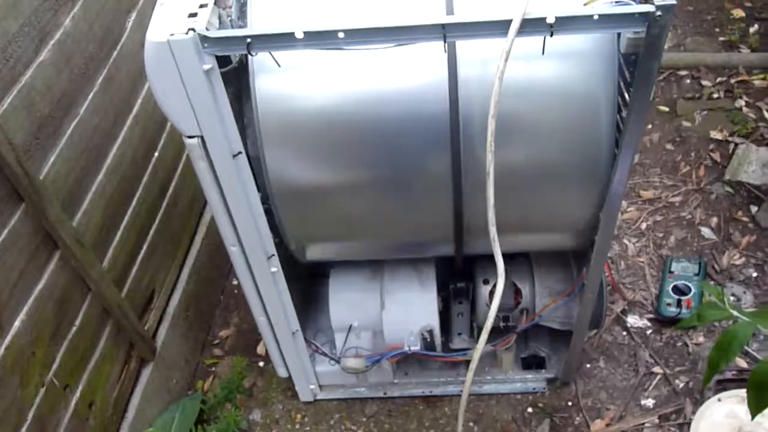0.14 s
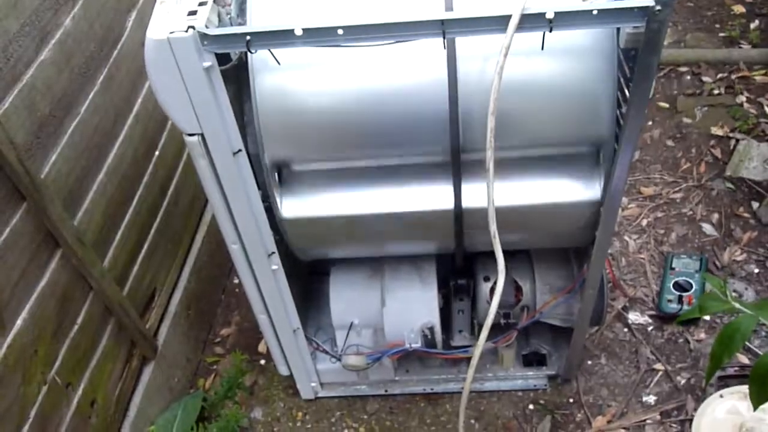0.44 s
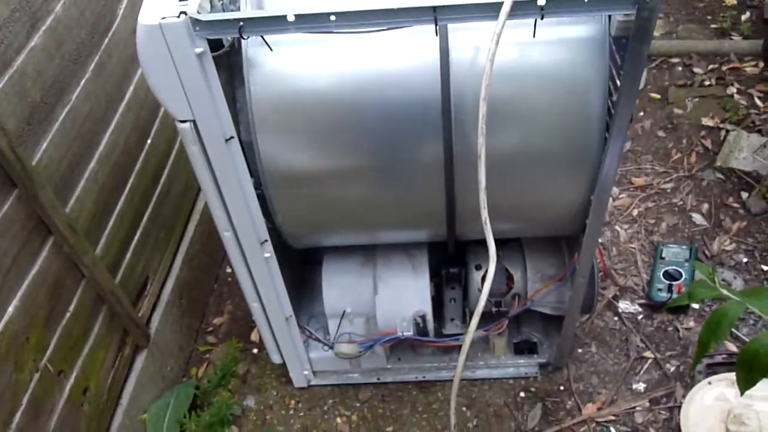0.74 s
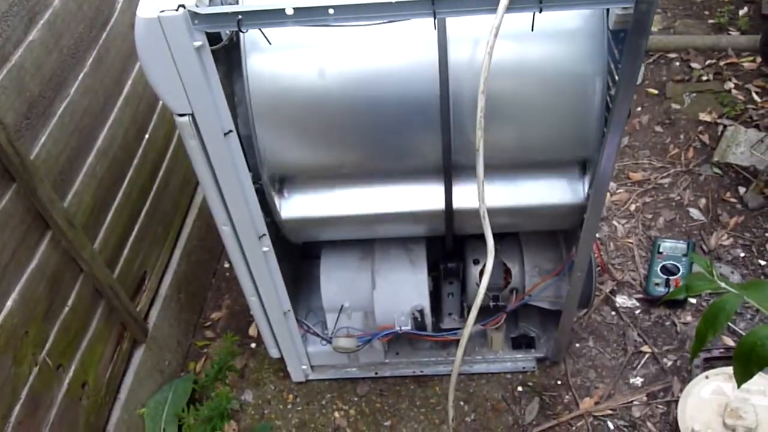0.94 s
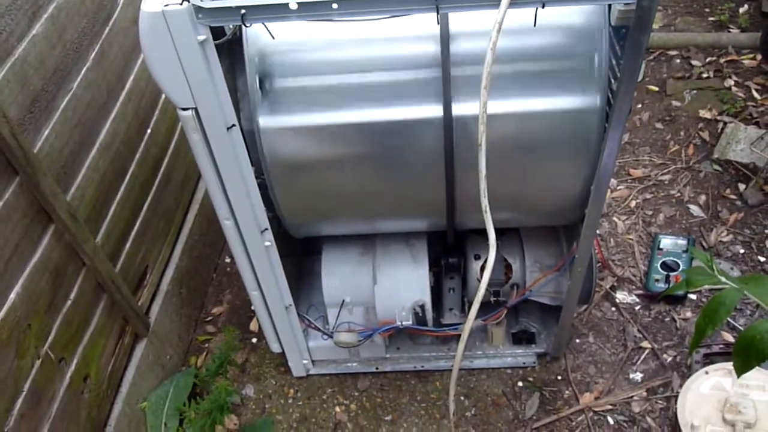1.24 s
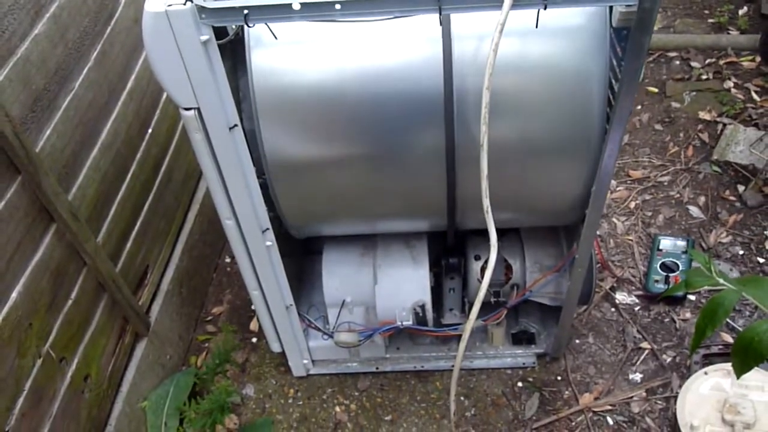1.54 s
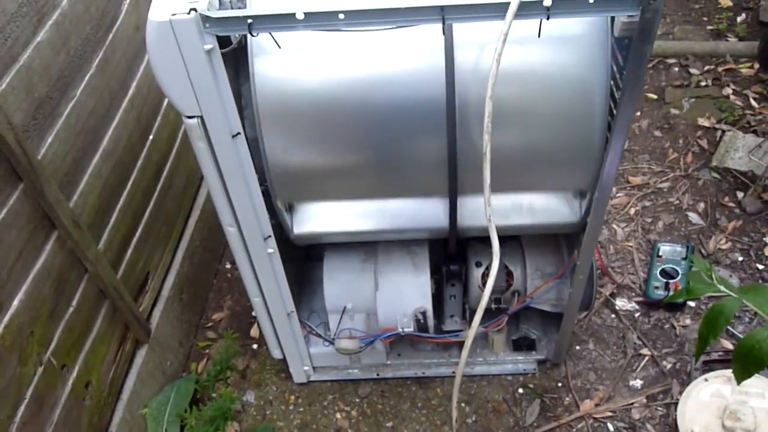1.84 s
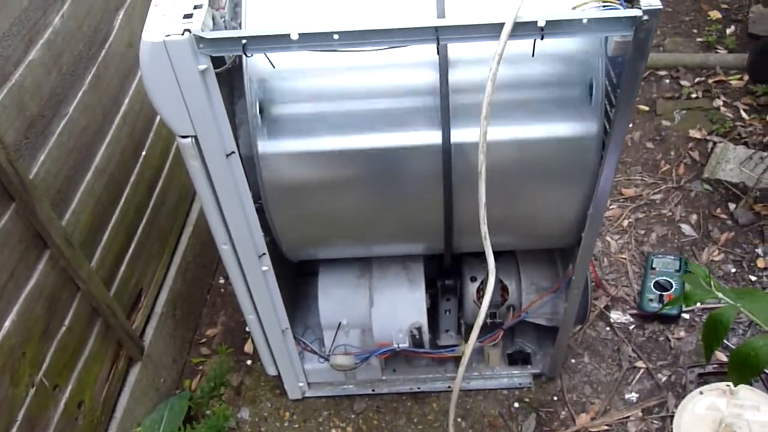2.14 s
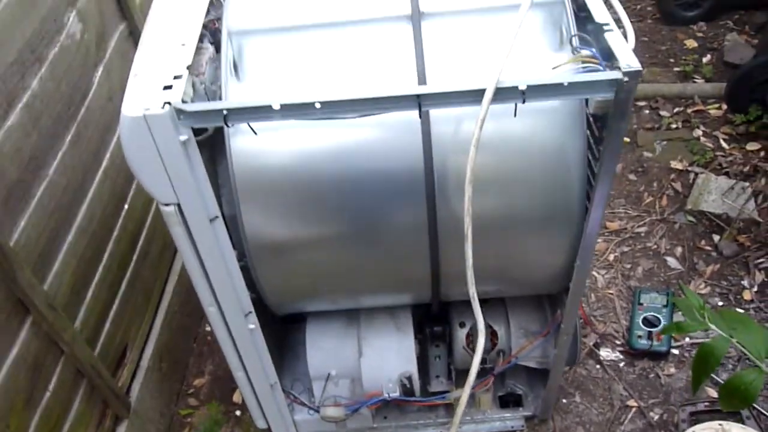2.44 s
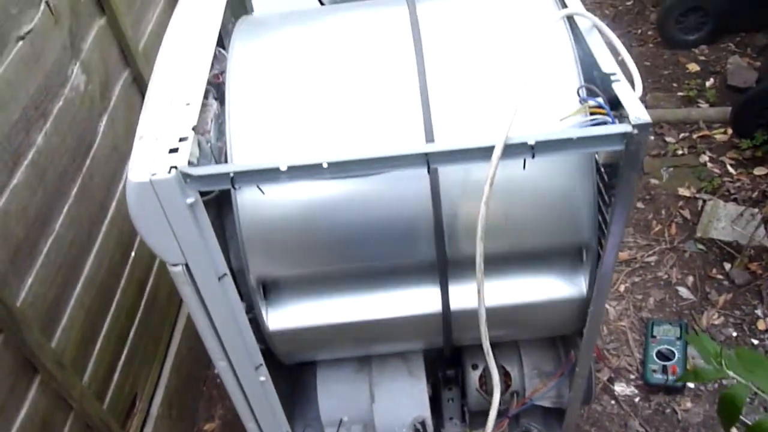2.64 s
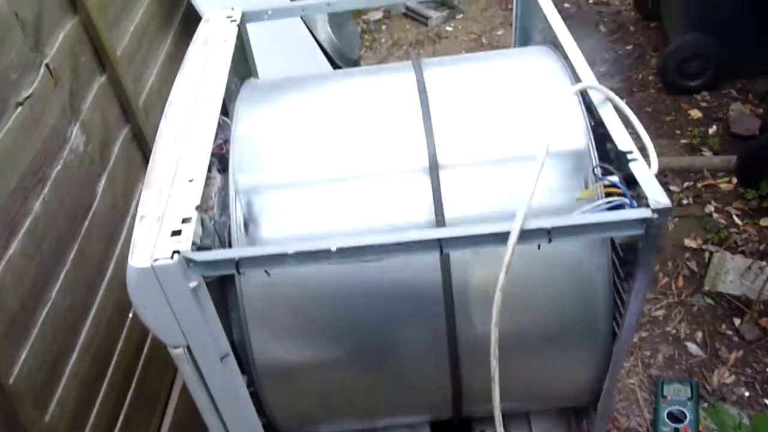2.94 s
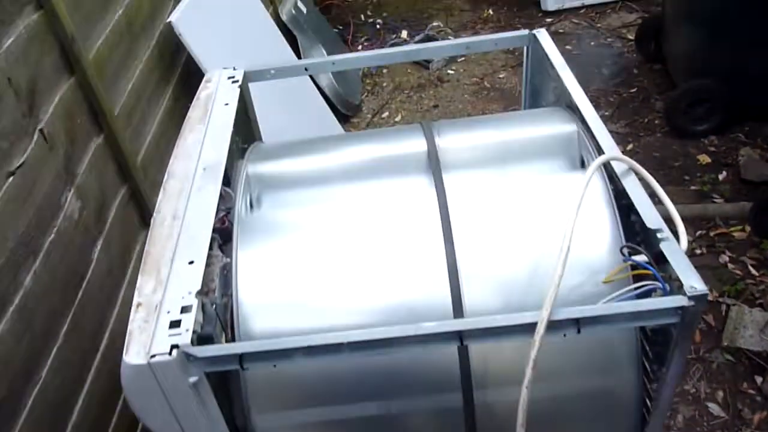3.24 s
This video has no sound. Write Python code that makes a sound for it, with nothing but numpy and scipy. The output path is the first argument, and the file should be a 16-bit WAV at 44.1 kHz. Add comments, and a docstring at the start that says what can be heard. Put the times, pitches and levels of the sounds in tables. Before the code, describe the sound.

A tumble dryer with panels removed runs outdoors, heard close on a hand-held stereo microphone: steady drum rumble, fan whine and hiss, a bright metal tick early, then scattered knocks, the strongest near the end.

```python
"""Open tumble dryer in a yard

Close, hand-held camera with a two-port microphone. A barely audible sub-bass offset dies away as the microphone
opens, under the motor's hum and fan whine, made of sines. The steel drum rumbles and its seals hiss, both
coloured noise; gritty contacts make the rim's scrapes. Blows ring the drum's modes and clatter its panels;
once, a bright metal tick shimmers and rings. The microphone opens abruptly; three notches dent the treble and
the top is cut."""
import sys
import numpy as np
from scipy import signal
from scipy.fft import rfft, irfft
from scipy.io import wavfile

SR = 44100
rng = np.random.default_rng(int(sys.argv[2]) if len(sys.argv) > 2 else 0)


def wav_out(sig):
    """Save sig, one row per channel (or a flat mono array), as 16-bit PCM at SR to the path in sys.argv[1]."""
    wavfile.write(sys.argv[1], SR, np.round(np.clip(np.atleast_2d(sig).T, -1, 1) * 32767).astype(np.int16))


N = 149058

# Decaying sub-bass swings, as the microphone opens and fainter later: start_s, level_db, pitch_hz, decay_s
SUB_BASS_SWINGS = [(.206, -20, 12, .025), (2.72, -35, 32, .035)]

# Fan whine, which follows the motor's speed: time_s, pitch_hz, level_db (before the trim)
WHINE = [(.2, 1030, -27), (.42, 1034, -27.5), (.6, 1043, -27.5), (.78, 1041, -28), (1.05, 1028, -26),
         (1.3, 1040, -28), (1.65, 1036, -28), (1.92, 1033, -27), (2.14, 1043, -27), (2.42, 1038, -28),
         (2.57, 1041, -27), (2.7, 1040, -30.5), (2.88, 1031, -33), (3.15, 1030, -41), (3.22, 1043, -32.5),
         (3.34, 1048, -29), (3.38, 1046, -31)]
WHINE_TRIM_DB, OCTAVE_DB, WHINE_LEFT_OVER_RIGHT_DB = -1.2, -16.5, -2.5
WHINE_FLUTTER, WHINE_JITTER = 0.14, 0.0014  # rms share of level, of pitch
HUM_HZ, HUM_DB = 201.1, -42

# Colour of the drum's rumble: frequency_hz, relative level_db per Hz
RUMBLE_COLOUR = [(25, -35), (45, -16), (65, -16.5), (90, -9.5), (130, -6), (175, -2), (240, -1),
                 (350, 0.65), (440, -4), (510, -.5), (610, -1.5), (690, -6), (860, -4), (1000, -1.5),
                 (1130, -7), (1400, -9), (1650, -12.5), (2100, -12), (2500, -17.5), (3200, -24.5),
                 (4500, -27.5), (8000, -47)]
# Rumble as the drum turns: time_s, relative level_db
RUMBLE_LEVEL = [(.2, 2.5), (.3, 0), (.48, 0.5), (.58, 0), (.72, 1.5), (.82, -0.5), (1.0, 0.5), (1.4, -1),
                (1.65, 0), (2.0, 1), (2.11, -0.5), (2.26, 0.7), (2.55, .5), (2.65, -0.5), (2.76, 0),
                (2.89, -1), (3.02, 1), (3.15, -0.5), (3.33, 1)]
RUMBLE_DB, RUMBLE_SWELL_DB, RUMBLE_FLICKER_DB = -25, 0.57, 0.36
CHATTER_PER_S, CHATTER_SPREAD_DB, CHATTER_POWER_SHARE = 500, 2.1, 0.34

# Colour of the seals sliding on the drum: frequency_hz, relative level_db per Hz
HISS_COLOUR = [(500, -53), (2500, 3), (4000, 3), (6000, 1), (8600, 1.5), (10500, -2), (13500, -3.5),
               (15500, -14.5)]
# Seals' hiss as the drum turns: time_s, relative level_db
HISS_LEVEL = [(.2, 1.5), (1.0, -1), (1.1, 0), (1.3, 0.5), (1.9, -0.5), (2.03, 1.5), (2.28, 1), (2.43, 1.5),
              (2.65, 0), (3.38, 0.1)]
HISS_DB, HISS_SWELL_DB = -37.5, 1.03

# Treble of rumble and hiss as the camera rises over the cabinet: time_s, relative level_db
TREBLE_LEVEL = [(.2, -0.9), (1.1, 0.6), (2.0, -1), (2.5, -0.5), (2.85, -1.5), (3.38, -2)]
TREBLE_FROM_HZ = 590

# Scrapes of the drum's rim: start_s, length_s, level_db, brightness_db
SCRAPES = [(.228, .035, -24.5, -6), (.38, .035, -33, 5), (.703, .02, -23, -5), (1.2, .04, -29.5, -4),
           (1.607, .025, -26, -1), (2.366, .017, -25.5, -3), (2.552, .034, -27.5, 2), (3.255, .022, -32, 3)]
# Colour of rubbing steel: frequency_hz, relative level_db per Hz
SCRAPE_COLOUR = [(500, -20), (900, -2), (1400, 0), (2100, -4), (3200, -11), (4200, -14), (7000, -32),
                 (12000, -48)]
SCRAPE_BRIGHT_HZ, SCRAPE_GRAINS_PER_S = 2500, 1800

# Drum knocks: start_s, level_db, ring pitch ratio, clatter_db (relative to the knock), rattle decay_s
KNOCKS = [(.356, -14.5, .8, -7, .015), (.386, -10, .95, -6, .022), (.694, -13.5, .97, -6, .02),
          (1.8782, -9, .85, 0, .011), (1.8935, -7.5, .86, -7, .018), (1.9045, -14, .88, -4, .008),
          (2.262, -17.5, .75, -6, .02), (2.801, -16.5, .68, -6, .012), (2.9394, -2, 1.02, -2.5, .007),
          (2.9512, -9, 1, .5, .008), (2.9625, -16, 1, 1, .01), (2.9762, -18, 2, 3, .008),
          (3.2595, -13, 1.03, -3, .018)]
# Ring of the drum: frequency_hz (before the pitch ratio), level_db, t60_s
DRUM_MODES = [(495, -11, .13), (545, 0, .052), (760, -11, .06), (1030, -10, .035), (1660, -17, .035),
              (1950, -9, .032)]
# Colour of the thin panels' dense, short clatter: frequency_hz, relative level_db per Hz
CLATTER_COLOUR = [(80, -45), (250, -18), (480, -2), (800, 0), (1400, -4), (2050, -1), (3000, -18),
                  (4200, -23), (7000, -36), (12000, -50)]
CLATTER_DB, RATTLE_DB, RATTLE_PER_S = -11, -10, 900
RING_RISE_S, RING_LOW_HZ = .0013, 330

# Snap and rebound of the metal tick: start_s, level_db
TICKS = [(.6258, -14.5), (.629, -16.5)]
# Colour of the tick's shimmer: frequency_hz, relative level_db per Hz
TICK_COLOUR = [(1200, -15), (3000, -3), (4200, -1.5), (5200, -5), (6200, 4), (7500, 0), (9500, 3.5),
               (13400, 2.5), (15500, -2)]
# Ring of the small metal part: frequency_hz, relative level_db, t60_s
TICK_MODES = [(5969, -3, .2), (6130, -1, .2), (7232, -3, .2), (8408, 0, .2), (9578, -2, .17),
              (11585, -5, .17), (13312, -1, .19)]
SHIMMER_DB, SHIMMER_T60_S, TICK_RING_DB = -20, 0.18, -34
TICK_CRACK_S = .0012  # decay time constant

# Scattered sound against the direct, at the ports: frequency_hz, level_db
SCATTER = [(60, -14), (130, -29), (300, -35), (600, -22), (1000, -15), (1500, -11.5), (2100, -2.5),
           (3000, -0.5), (6000, -4), (9000, -0.5), (12000, 2.5), (15000, -1)]
# Left port over right port: frequency_hz, level_db
BALANCE = [(300, 0.3), (1000, -1), (2200, -2), (3500, -1.5), (6000, -0.7), (8700, 0.5), (11000, -0.5),
           (15000, 0.5)]
CABINET_DB, CABINET_DECAY_S = -4, 0.0072  # tail against the contact, time constant

# Notches in the treble: frequency_hz, width_hz
NOTCHES = [(2605, 600), (4610, 1100), (7910, 620)]
OPENS_S, TOP_HZ = .206, 15700

SIDES = np.array([[1], [-1]])  # left, right


def undb(db):
    """Decibels to an amplitude factor."""
    return 10 ** (np.asarray(db) / 20)


def unit(x):
    """Scale to rms 1."""
    return x / np.sqrt(np.mean(x ** 2))


def times():
    """Time of each sample in seconds."""
    return np.arange(N) / SR


def since(start):
    """Seconds since a start, zero before it."""
    return np.maximum(times() - start, 0)


def over_time(points):
    """Join (time, value) points by straight lines."""
    return np.interp(times(), *np.array(points).T)


def bins():
    """Frequency of each bin in Hz, nudged off zero for the logarithm."""
    return np.arange(N // 2 + 1) * SR / N + 1e-6


def over_hz(points):
    """Join (Hz, value) points on a log-frequency axis."""
    hz, value = np.array(points).T
    return np.interp(np.log(bins()), np.log(hz), value)


def colour(x, points):
    """Give a sound a spectrum, at rms 1."""
    return unit(irfft(rfft(x) * undb(over_hz(points)), N))


def above(x, hz):
    """The part of a sound above a soft crossover."""
    return irfft(rfft(x) / (1 + (hz / bins()) ** 4), N)


def walk(rate_hz):
    """Smooth random drift of rms 1, from 1/4 Hz to about the given rate."""
    band = np.exp(-(bins() / rate_hz) ** 2) * (bins() > 1 / 4)
    return unit(irfft(rfft(rng.standard_normal(N)) * band, N))


def clicks(per_s, spread_db):
    """Random contacts of uneven size and either sign, at rms 1."""
    struck = rng.random(N) < per_s / SR
    sign = rng.choice([-1, 1], N)
    size = undb(spread_db * np.minimum(rng.exponential(size=N), np.pi))
    return unit(struck * sign * size)


def spread(direct, scattered):
    """Direct sound arrives alike at both ports; sound scattered by the cabinet arrives in opposite sign."""
    scatter = undb(over_hz(SCATTER))
    both = (rfft(direct) + SIDES * scatter * rfft(scattered)) / np.sqrt(1 + scatter ** 2)
    return irfft(both * undb(SIDES * over_hz(BALANCE) / 2), N)


def coloured_noise(points):
    """Steady noise of a given spectrum, spread over the two ports."""
    return colour(spread(*rng.standard_normal((2, N))), points)


def smear(x, decay_s):
    """Spread each pulse over a short, dense noise tail of the same energy."""
    t = times()[:SR // 20]
    tail = rng.standard_normal(len(t)) * np.exp(-t / decay_s)
    tail = tail / np.linalg.norm(tail)
    return irfft(rfft(x, 2 * N) * rfft(tail, 2 * N))[..., :N]


def cabinet(x):
    """Close steel walls give each contact a short tail."""
    return unit(x + undb(CABINET_DB) * smear(x, CABINET_DECAY_S))


def sub_bass_swings():
    """Decaying sub-bass sines, the first an offset that dies away as the microphone opens."""
    out = 0
    for start, db, hz, decay in SUB_BASS_SWINGS:
        age = since(start)
        out = out - undb(db) * np.exp(-age / decay) * np.sin(2 * np.pi * hz * age)
    return out


def motor():
    """The fan's fluttering whine with its octave, over the hum of the windings."""
    at, pitch, db = np.array(WHINE).T
    hz = np.interp(times(), at, pitch) * (1 + WHINE_JITTER * walk(16.2))
    phase = 2 * np.pi * np.cumsum(hz) / SR
    whine = np.sin(phase) * (1 + WHINE_FLUTTER * walk(64))
    whine = whine + undb(OCTAVE_DB) * np.sin(2 * phase) * (1 + 0.3 * walk(3.9))
    whine = whine * undb(np.interp(times(), at, db) + WHINE_TRIM_DB)
    whine = whine * undb(SIDES * WHINE_LEFT_OVER_RIGHT_DB / 2)
    hum = undb(HUM_DB) * np.sin(2 * np.pi * HUM_HZ * times()) * (1 + .4 * walk(7))
    return np.sqrt(2) * (whine + hum)  # a sine of rms 1


def shaking():
    """Dense small contacts, with the cabinet's tail, mixed with the steady noise of rolling."""
    chatter = cabinet(clicks(CHATTER_PER_S, CHATTER_SPREAD_DB))
    rolling = rng.standard_normal(N)
    return np.sqrt(CHATTER_POWER_SHARE) * chatter + np.sqrt(1 - CHATTER_POWER_SHARE) * rolling


def drum():
    """Rolling and dense small contacts shake the drum while its seals hiss."""
    rumble_db = RUMBLE_DB + over_time(RUMBLE_LEVEL)
    rumble_db = rumble_db + RUMBLE_SWELL_DB * walk(22.0) + RUMBLE_FLICKER_DB * walk(64)
    rumble = colour(spread(shaking(), shaking()), RUMBLE_COLOUR) * undb(rumble_db)
    hiss_db = HISS_DB + over_time(HISS_LEVEL) + HISS_SWELL_DB * walk(9.1)
    hiss = coloured_noise(HISS_COLOUR) * undb(hiss_db)
    both = rumble + hiss
    return both + above(both, TREBLE_FROM_HZ) * (undb(over_time(TREBLE_LEVEL)) - 1)


def scrapes():
    """The drum's rim rubs briefly: a swell of dense, gritty contacts."""
    grains = [cabinet(clicks(SCRAPE_GRAINS_PER_S, 1)) for _ in range(2)]
    grit = colour(spread(*grains), SCRAPE_COLOUR)
    edge = above(grit, SCRAPE_BRIGHT_HZ)
    out = 0
    for start, length, db, bright_db in SCRAPES:
        along = np.clip((times() - start) / length, 0, 1)
        swell = 2 * np.sqrt(along * (1 - along))  # a half-ellipse, peak 1
        out = out + undb(db) * swell * (grit + (undb(bright_db) - 1) * edge)
    return out


def drum_ring(tuning):
    """Decaying modes of the drum, with a soft rise, for a blow on one spot."""
    t = times()[:SR // 5]
    ring = 0
    for hz, db, t60 in DRUM_MODES:
        ring = ring + undb(db - 60 * t / t60) * np.sin(2 * np.pi * hz * tuning * t)
    return ring * (1 - np.exp(-t / RING_RISE_S))


def knocks():
    """Each blow and its dying rattle ring the drum, at a pitch set by the spot struck, and shake the panels."""
    rattle = clicks(RATTLE_PER_S, 0.67)
    body, panel_level = 0, 0
    for start, db, tuning, clatter_db, decay in KNOCKS:
        fade = (times() >= start) * np.exp(-since(start) / decay)
        blow = signal.unit_impulse(N, int(start * SR))
        # the root evens out the rattle's energy over long and short decays
        force = blow + undb(RATTLE_DB) * rattle * fade * np.sqrt(2 / (decay * SR))
        body = body - undb(db) * signal.fftconvolve(force, drum_ring(tuning))[:N]
        panel_level = panel_level + undb(db + clatter_db) * fade
    # the ring carries little bass
    body = signal.lfilter(*signal.butter(2, RING_LOW_HZ, "high", fs=SR), body)
    quarter_turn = np.imag(signal.hilbert(body))  # the same ring, 90 degrees out of phase
    clatter = coloured_noise(CLATTER_COLOUR) * panel_level
    return spread(body, quarter_turn) + undb(CLATTER_DB) * clatter


def tick():
    """A hard snap and its rebound on thin metal, a short dense shimmer and a few lasting modes."""
    start = TICKS[0][0]
    age = since(start)
    level = undb(SHIMMER_DB) * np.exp(-np.log(1000) * age / SHIMMER_T60_S)
    for at, db in TICKS:
        level = level + undb(db) * (times() >= at) * np.exp(-since(at) / TICK_CRACK_S)
    shimmer = coloured_noise(TICK_COLOUR) * level
    ring = 0
    for hz, db, t60 in TICK_MODES:
        turns = hz * age + rng.random((2, 1))  # own phase at each port
        ring = ring + undb(db) * np.exp(-np.log(1000) * age / t60) * np.sin(2 * np.pi * turns)
    return (shimmer + undb(TICK_RING_DB) * ring) * (times() >= start)


def scene():
    """The dryer's sounds and the sub-bass swings together."""
    return sub_bass_swings() + motor() + drum() + scrapes() + knocks() + tick()


def record(dry):
    """The microphone opens abruptly; three notches dent the treble and the top is cut."""
    out = dry * (times() >= OPENS_S)
    for hz, width in NOTCHES:
        out = signal.lfilter(*signal.iirnotch(hz, hz / width, fs=SR), out)
    top_cut = signal.ellip(10, .2, 90, TOP_HZ, fs=SR, output="sos")
    return signal.sosfilt(top_cut, out)


dry = scene()
out = record(dry)
wav_out(out)
```